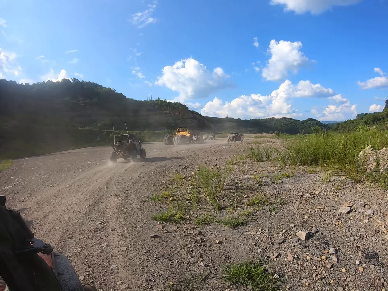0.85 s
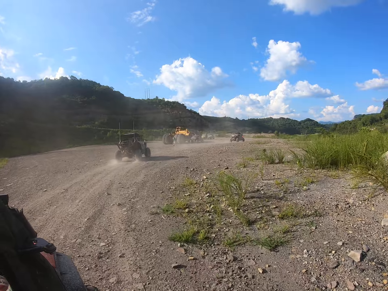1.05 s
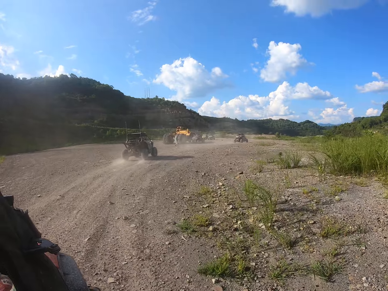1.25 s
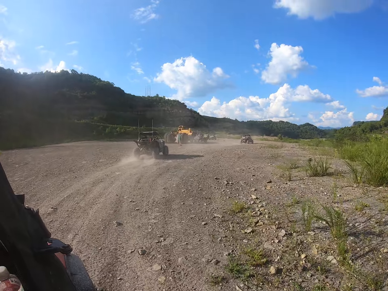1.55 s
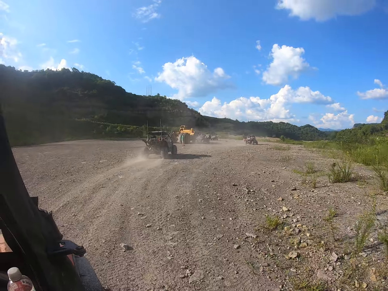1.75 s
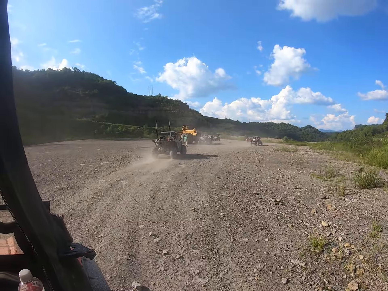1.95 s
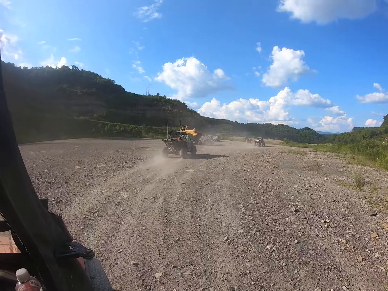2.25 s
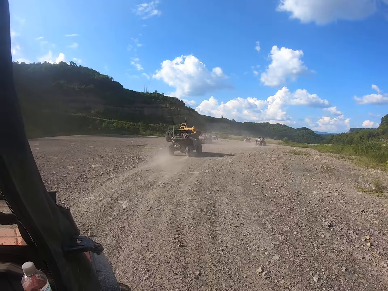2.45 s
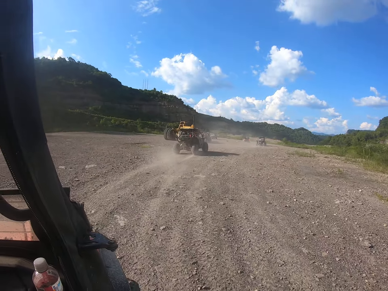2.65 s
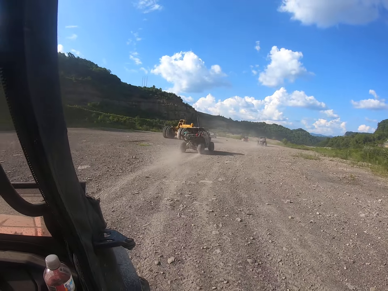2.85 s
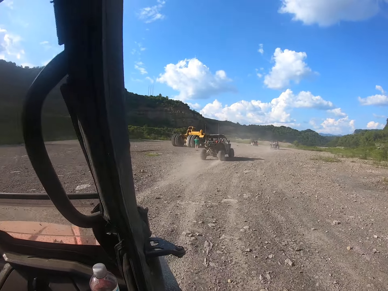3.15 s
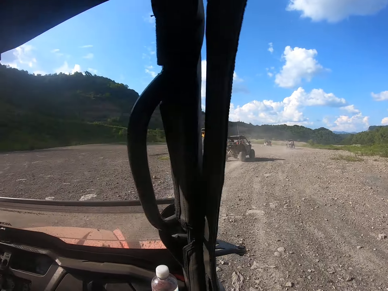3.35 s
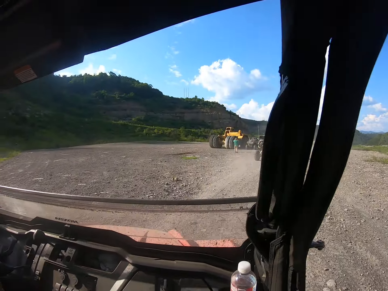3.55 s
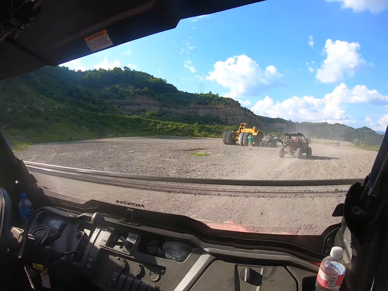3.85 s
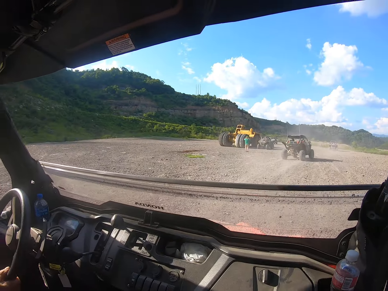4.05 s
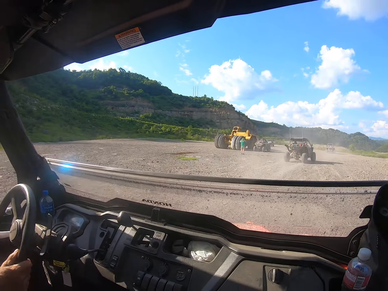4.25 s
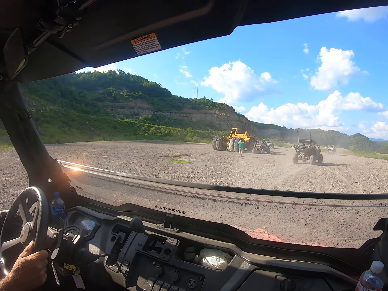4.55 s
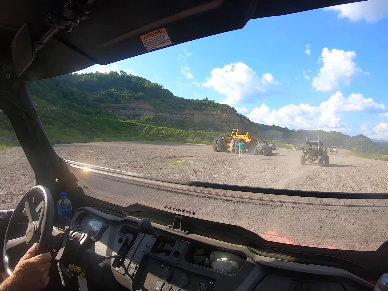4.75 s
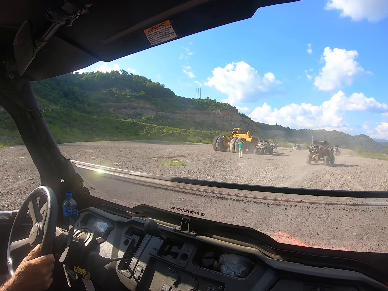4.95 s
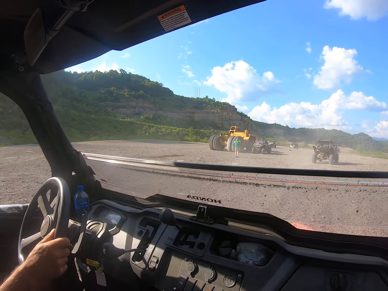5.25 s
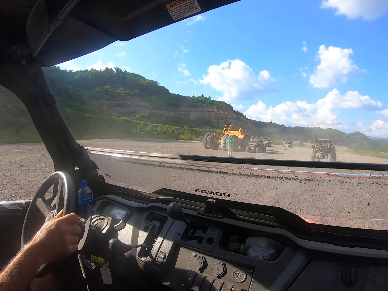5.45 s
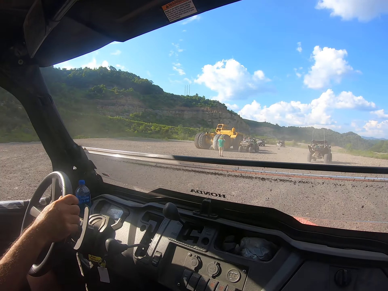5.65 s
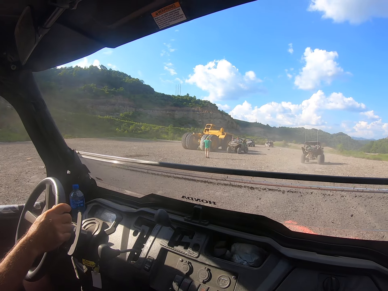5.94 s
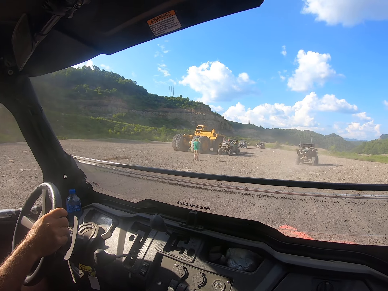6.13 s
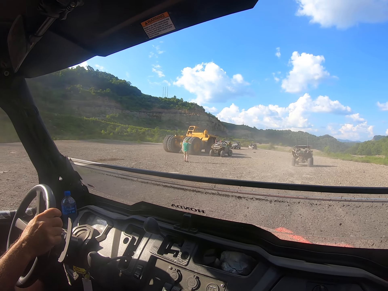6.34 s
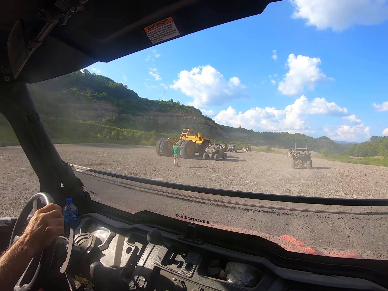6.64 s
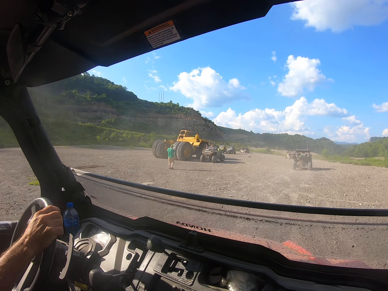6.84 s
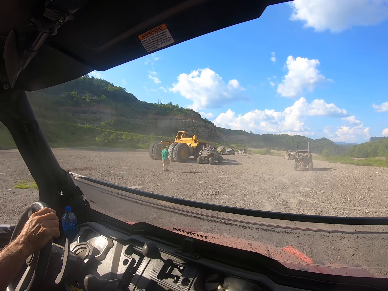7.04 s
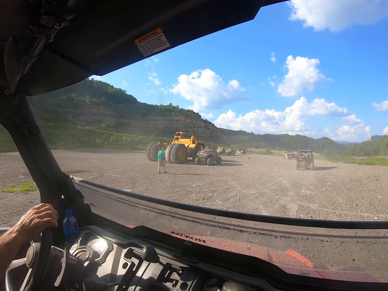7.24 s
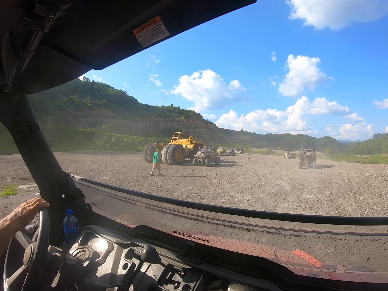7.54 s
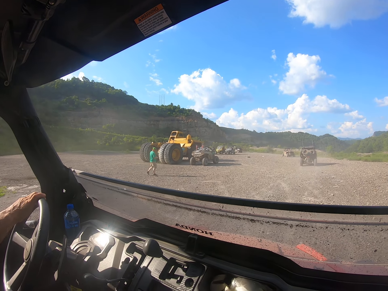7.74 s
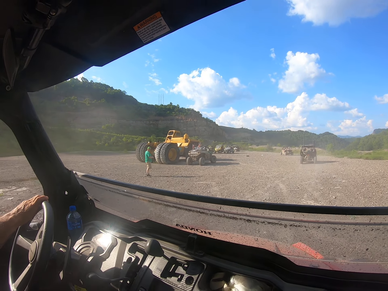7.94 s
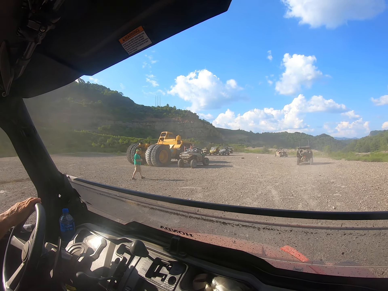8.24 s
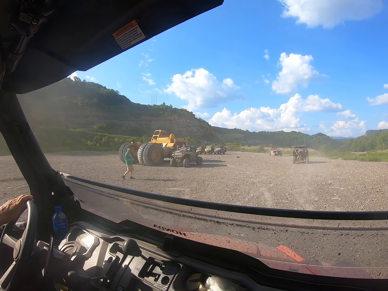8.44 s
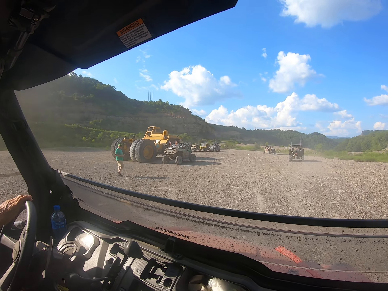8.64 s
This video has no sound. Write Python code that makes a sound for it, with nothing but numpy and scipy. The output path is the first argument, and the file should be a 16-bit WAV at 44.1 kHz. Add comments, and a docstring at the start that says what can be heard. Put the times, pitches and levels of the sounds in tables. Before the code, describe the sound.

From the passenger side of an off-road buggy on a stony track, heavy low wind buffets the microphone while loose plastic knocks rapidly. The twin-cylinder engine drones under tyre hum, gear whine and gravel crunch. The microphone then moves inside: wind drops, a hand scuffs its housing, panels clatter on bumps, and the vehicle gradually slows with a lower engine note.

```python
"""Passenger seat of a side-by-side on a stony trail: it picks up speed for 2.5 s, then slows.
A twin-cylinder engine drones in multiples of its firing rate; tread hum and gear whine follow road speed.
Gravel and wind are coloured noise; a loose plastic fitting, cab panels and stones ring as struck modes.
One microphone starts out in the wind and is drawn into the cab; a hand then scuffs and rubs its housing."""
import sys
import numpy as np
from scipy import signal
from scipy.fft import rfft, irfft, next_fast_len
from scipy.io import wavfile

SR = 44100
rng = np.random.default_rng(int(sys.argv[2]) if len(sys.argv) > 2 else 0)


def digitize_waveform(pressure):
    """Quantize a signal to 16-bit integers and store it at the path in sys.argv[1].

    Rows of a 2-D input are taken as channels; values are limited to [-1, 1].
    """
    field = np.atleast_2d(pressure).T
    bounded = np.clip(field, -1, 1)
    quanta = np.round(bounded * 32767).astype(np.int16)
    wavfile.write(sys.argv[1], SR, quanta)


N = 387625
TIME = np.arange(N) / SR   # s

# wind at the microphone: f/Hz, relative level/dB per Hz
WIND_SPECTRUM = [(12, -21), (26, 6), (48, -3.5), (70, -15.5), (130, -18), (200, -22), (320, -31.5),
                 (800, -77)]
# gusts and lulls: t/s, half length/s, rise/dB
GUSTS_AND_LULLS = [(0.148, 0.24, -2), (.72, 0.14, 1.5), (1.752, 0.11, -2), (2.29, 0.27, 2), (3.25, 0.13, 7)]
WIND_OUTSIDE_DB, WIND_INSIDE_DB, WIND_DB_PER_DOUBLING = -22, -37.5, 16
CRUISE_LUGS_PER_S = 69   # the draught in the cab has its inside level at this speed
CAB_ENTRY_S, CAB_INSIDE_S = 2.87, 3.5   # the microphone is drawn in between these times

# strokes of the hand on the housing: t/s, length/s, body level/dB, hiss level/dB
SCUFF_STROKES = [(3.861, .088, -24, -40), (3.95, .035, -28.5, -44), (4.018, .042, -27, -44),
                 (4.07, .045, -38, -46), (4.479, .034, -25, -48)]
SCUFF_ATTACK_S, SCUFF_RELEASE_S = .002, .009
# dull rubs and bumps on the housing: t/s of the middle, half length/s, f/Hz in the middle, glide/(Hz per s), level/dB
HOUSING_RUBS = [(3.872, .007, 85, 0, -13), (3.942, .008, 70, 0, -10.5), (4.03, .025, 145, -500, -16.5),
                (4.28, .013, 65, 0, -22), (4.445, .006, 150, 0, -18), (4.555, .038, 194, -200, -16.5),
                (4.742, .019, 186, 1000, -15), (4.812, .028, 185, -300, -24), (5.0, .014, 195, -1000, -19),
                (5.108, .027, 200, -300, -15.5), (5.118, .027, 105, -500, -19), (5.91, .03, 175, 0, -26),
                (6.015, .045, 185, 0, -23)]
# scuffed housing: f/Hz, relative level/dB per Hz
HOUSING_SPECTRUM = [(350, -18), (600, -7), (1000, 13), (1600, 10), (2400, 2), (2750, -16), (3500, -12),
                    (3900, -26), (4700, -17), (5500, -34), (6500, -39), (8500, -45), (11000, -58),
                    (13800, -51)]
# hiss of skin: f/Hz, relative level/dB per Hz
SKIN_SPECTRUM = [(2000, 14), (3000, 9), (3900, 0), (4800, 7), (5800, -7), (8000, -11.5), (10500, -19),
                 (14000, -29)]

# stones that ping off metal: t/s, peak level/dB, f/Hz, t60/s
STONE_PINGS = [(2.402, -52, 8900, .008), (4.408, -57, 11200, .003), (4.998, -47, 9600, 0.0035),
               (5.353, -48, 7500, .0006), (7.771, -44, 8100, 0.0014), (8.488, -46, 6000, .0005)]
LOOSE_STONES_S, LOOSE_STONES_HALF_S, LOOSE_STONES_DB = 6.15, .4, 4.5   # the patter swells over loose stones

# blows of the loose fitting: t/s, level/dB of the low, middle and high modes, crack level/dB
FITTING_KNOCKS = [(0.029, -40.5, -36.5, -51, -68), (0.094, -45, -35.5, -30.5, -65),
                  (0.432, -35, -37, -57, -63), (0.569, -39, -42, -50, -68), (0.591, -41, -37.5, -34, -65),
                  (0.683, -30.5, -26, -23.5, -44), (0.744, -27, -22.5, -25, -48),
                  (0.817, -36, -32, -41, -61), (0.829, -26.5, -19, -23.5, -50),
                  (0.85, -37, -28.5, -31, -65), (0.914, -27.5, -18.5, -25, -46),
                  (0.976, -28, -33.5, -43, -62.5), (1.006, -24.5, -21, -37, -57.0),
                  (1.022, -31, -26, -28, -53), (1.042, -38, -35, -21.5, -49),
                  (1.111, -21.5, -18.5, -24, -43), (1.157, -25, -24.5, -47, -67),
                  (1.192, -32, -33, -46, -69), (1.24, -33, -29, -37, -68.0),
                  (1.279, -23, -20.5, -31.5, -48), (1.289, -27.5, -24.5, -44, -55.5),
                  (1.415, -25.5, -24.5, -37, -57.5), (1.452, -26, -36, -28, -51),
                  (1.46, -22.5, -18.5, -29, -41), (1.475, -35, -27, -33, -66.5),
                  (1.502, -29.5, -35, -54, -63.5), (1.514, -37, -36.5, -52, -63),
                  (1.56, -30, -28, -35, -67), (1.677, -21.5, -21, -28.5, -48),
                  (1.685, -29, -25.5, -47, -57), (1.787, -30.5, -40, -47, -62),
                  (3.435, -47, -35.5, -47, -56), (3.468, -33, -35.5, -44, -64.5),
                  (3.511, -25, -19.5, -28.5, -58.0), (3.525, -27.5, -27, -36, -64.5),
                  (3.634, -33, -31.5, -40, -67), (3.673, -35, -37, -44, -64),
                  (3.733, -35.5, -31.5, -39, -64.5), (3.99, -28.5, -31, -26.5, -46),
                  (4.02, -27.5, -35, -33, -44), (4.109, -40.5, -48, -54, -64), (4.149, -53, -44, -50, -66),
                  (4.209, -38, -39, -45, -60.0), (4.263, -38, -48, -49, -66), (4.504, -40, -34, -46, -57),
                  (4.659, -52.5, -39.5, -38.5, -64), (4.8, -42, -31, -40, -64), (4.859, -49, -50, -49, -66),
                  (4.907, -43, -41, -46, -63), (6.665, -39, -43, -31.5, -40)]
KNOCK_S = .02   # levels of knocks and cracks are those of their energy spread over this time
# modes of the fitting in a low, a middle and a high group: nominal f/Hz, relative level/dB, t60/s
FITTING_MODES = [
    [(662, -5.5, 0.044), (735, 6, 0.0085)],
    [(1011, 0.5, 0.018), (1118, 2.5, 0.02), (1252, -2.5, 0.011)],
    [(1380, 5.5, 0.0057), (1664, 0, 0.019), (2260, -9, 0.011)],
]
FITTING_BAND_HZ = (520, 2270)   # too small to radiate below this band, too soft to ring above it
# clatter of the cab panels: t/s, peak level of the ringing/dB, decay time of the skid/s, crack level/dB
PANEL_CLATTER = [(3.162, -24, 0.0031, -57), (3.334, -21.5, 0.0032, -61), (4.442, -20, 0.0027, -60),
                 (4.721, -33, .003, -60), (4.777, -29, .006, -50), (4.80, -34, 0.0037, -59),
                 (4.9503, -26, 0.013, -57), (5.198, -26.5, 0.012, -45), (5.356, -33, .005, -47),
                 (5.764, -22.5, 0.026, -58), (5.8024, -22.5, 0.015, -50), (5.866, -20, 0.0046, -59),
                 (5.902, -18, 0.011, -54), (5.9684, -27, 0.0045, -55), (6.1984, -23.5, .006, -61),
                 (6.278, -25, .008, -60), (6.476, -22, 0.011, -59), (7.774, -38, 0.0056, -44),
                 (8.49, -29.5, 0.013, -47)]
# modes of the panels: nominal f/Hz, relative level/dB, nominal t60/s
PANEL_MODES = [(716, -7, 0.0072), (1043, 0, 0.03), (1193, -8.5, 0.063), (1454, -1.5, 0.019),
               (1908, 2.5, 0.021), (2250, 2, 0.015), (2970, -12.5, 0.014), (3290, -10.5, 0.013),
               (4660, -10.5, 0.011), (5600, -26, 0.0087)]
# snap of a hard contact: f/Hz, relative level/dB per Hz
CRACK_SPECTRUM = [(1500, -5), (2600, 3), (3000, 9), (3450, 5), (4000, -11), (4700, -7), (5600, -15.5),
                  (7000, -32.5), (11000, -35)]

# the ground under way: t/s, reference level of the gears/dB, reference level of the gravel/dB
GROUND_LEVEL = [(0, -40.5, -53.5), (.55, -38, -50), (1.0, -40.5, -54.5), (2.3, -38.5, -48.5),
                (3.4, -35, -49), (4.3, -39, -51), (5.4, -37, -50.5), (6.2, -34.5, -48), (7.9, -37.5, -48),
                (8.79, -42.5, -50.5)]
# gravel grit: f/Hz, relative level/dB per Hz
GRAVEL_SPECTRUM = [(1800, -11.5), (2400, 3.5), (2750, 0.5), (3300, 2.5), (3900, -7), (4550, -4.5),
                   (5200, -13.5), (5800, -12.5), (6500, -17.5), (8300, -17), (9100, -24), (9900, -32.5),
                   (11000, -29), (13800, -39)]
# tyre roar: f/Hz, relative level/dB per Hz
ROAR_SPECTRUM = [(300, -6), (500, 0.5), (650, -4), (800, -4), (1050, 1), (1280, -6), (1700, -6.5),
                 (3000, -44.5)]
# floor pan heard in the cab: f/Hz, relative level/dB per Hz
FLOOR_SPECTRUM = [(250, -7.5), (340, 0.5), (460, 2.5), (560, -2.5), (720, -8), (900, -19)]
# chassis boom: f/Hz, relative level/dB per Hz
CHASSIS_SPECTRUM = [(30, -17), (60, 15), (110, 12), (180, 8.5), (250, 0), (330, 0), (450, -8.5),
                    (600, -25.5), (1200, -46.5)]
CHASSIS_OUTSIDE_DB, CHASSIS_INSIDE_DB = -33, -31
ROUGH_PATCH_S, ROUGH_PATCH_HALF_S, ROUGH_PATCH_DB = 3.83, 0.11, 4   # the chassis booms over a rough patch

# road speed: t/s, tread lugs per s
LUG_RATE = [(0, 52), (1, 72), (1.8, 74.5), (2.5, 80.5), (3.0, 73), (3.4, 72.7), (4.2, 69), (4.8, 63.5),
            (5.8, 59.5), (6.3, 55.7), (6.8, 54), (7.15, 51.2), (7.8, 50.5), (8.6, 47)]
# tread hum: multiple of the lug rate, relative level/dB
TREAD_ORDERS = [(1, 10), (2, -6.5)]
# strength of the tread hum: t/s, level/dB
TREAD_LEVELS = [(0, -28), (1.4, -45), (2.2, -32), (3.4, -25.5), (4.0, -42), (4.9, -31.5), (7.1, -35),
                (7.8, -32.5), (8.79, -48)]

# gear mesh: multiple of the lug rate, width/Hz, relative level/dB, loudest near f/Hz, reach/Hz
GEAR_MESH = [(28.2, 26, -16, 2100, 260), (30.37, 12, -10, 1600, 360), (30.54, 38, -10, 2230, 150),
             (31.6, 12, -11, 1490, 160), (32.63, 34, -12.5, 1470, 690), (33.4, 34, -17, 2350, 170),
             (68.7, 32, -15, 3330, 45)]
# three modes of the gearbox casing: f/Hz, width/Hz
CASING_MODES = [(1680, 27), (1800, 26), (2295, 42)]
# strength of those three modes: t/s, then relative level/dB of each
CASING_LEVELS = [(0, -15.5, -17, -13), (2.2, -7.5, -11, -13), (3.3, -12, -11, -23), (4.4, -12, -6.5, -27),
                 (5.4, -14, -11, -16), (6.7, -6.5, -6.5, -24.5), (7.6, -12, -10, -15.5),
                 (8.79, -5.5, -22, -18)]
# gear whirr: f/Hz, relative level/dB per Hz
GEAR_SPECTRUM = [(1000, -48), (1310, -11), (1460, 7.5), (1750, 5), (2000, 5), (2400, 0), (2600, -31.5),
                 (3500, -47.5)]

# belt whistle: t/s, mean level/dB
BELT_LEVEL = [(3.3, -82), (3.7, -68), (4.3, -74), (4.95, -67.5), (5.25, -73), (5.55, -68), (6.7, -63.5),
              (6.95, -57.5), (7.3, -61.5), (7.6, -58), (8.2, -58.5), (8.5, -70)]
WHISTLE_PER_FIRING = 103.3   # the belt whistles at this multiple of the firing rate

# engine speed: t/s, firings per s
FIRING_RATE = [(0, 55), (2.2, 52.6), (4.6, 53.6), (5.0, 52.7), (5.55, 53), (6.05, 50.8), (6.25, 48.9),
               (6.7, 48.2), (6.95, 47.1), (7.25, 44), (7.6, 46.6), (8.05, 44.8), (8.3, 43.2), (8.79, 41.8)]
# exhaust: multiple of the firing rate, relative level/dB
EXHAUST_ORDERS = [(1, -9), (1.5, -26), (2, 3.5), (2.5, -4), (3, -9), (3.5, -16.5), (4, -13), (4.5, -14),
                  (5, -21), (5.5, -21.5), (6, -24.5), (6.5, -27), (7, -16), (8, -27)]
# strength of the exhaust: t/s, level/dB
EXHAUST_LEVELS = [(0, -35.5), (2.5, -30), (4.7, -29), (5.3, -32), (6.35, -23), (7.15, -28.5), (7.8, -26),
                  (8.79, -31)]
INTAKE_S, INTAKE_HALF_S, INTAKE_DB = 2.15, 0.55, -45   # the intake sings under throttle

CUTOFF_HZ = 14000


def from_db(db):
    """Decibels to gain."""
    return 10 ** (np.asarray(db) / 20)


def rms_one(x):
    """Scale to unit power."""
    return x / np.sqrt(np.mean(x ** 2) + 1e-20)


def in_time(rows):
    """Each column of a curve at every sample."""
    s, *columns = np.transpose(rows)
    return [np.interp(TIME, s, c) for c in columns]


def swell(s, half_s):
    """A smooth rise and fall of height 1 round a given time."""
    return np.exp(-((TIME - s) / half_s) ** 2 / 2)


def drift(rate):
    """Slow chance of spread 1: low-passed noise, drawn every 40 samples and joined by lines."""
    step = 40
    r = np.exp(-2 * np.pi * rate * step / SR)
    steps = rng.standard_normal(N // step + 2002)
    slow = signal.lfilter([1], [1, -2 * r, r * r], steps)[2000:]   # the filter has settled by then
    return np.interp(np.arange(N) / step, np.arange(len(slow)), rms_one(slow))


def colour(x, spectrum):
    """Give an excitation a spectrum; rms 1."""
    size = next_fast_len(len(x))
    hz, db = np.transpose(spectrum)
    log_bins = np.log(np.fft.rfftfreq(size, 1 / SR) + 1e-3)
    gain = from_db(np.interp(log_bins, np.log(hz), db, left=-120, right=-120))
    return rms_one(irfft(rfft(x, size) * gain, size)[:len(x)])


def noise(spectrum, flutter_db, rate):
    """Coloured noise whose strength flutters."""
    return colour(rng.standard_normal(N) * from_db(flutter_db * drift(rate)), spectrum)


def turning(per_s):
    """Angle of something that turns at a changing rate."""
    return 2 * np.pi * np.cumsum(per_s * np.ones(N)) / SR


def narrow(hz, width_hz):
    """A rough tone: noise gathered round a moving centre; rms 1."""
    angle = turning(hz)
    return rms_one(drift(width_hz) * np.cos(angle) + drift(width_hz) * np.sin(angle))


def orders(per_s, table, rough, rough_rate):
    """Multiples of a rotation, each unsteady in strength and timing; rms 1."""
    angle = turning(per_s)
    total = np.zeros(N)
    for multiple, db in table:
        strength = from_db(db) * (1 + rough * drift(rough_rate))
        phase = rng.uniform(0, 2 * np.pi) + rough * drift(rough_rate)
        total += strength * np.sin(multiple * angle + phase)
    return rms_one(total)


def ring(clicks, hz, t60):
    """A unit click sets a decaying sine of height 1 ringing."""
    r, w = from_db(-60 / (t60 * SR)), 2 * np.pi * hz / SR
    return signal.lfilter([0, np.sin(w)], [1, -2 * r * np.cos(w), r * r], clicks + 1e-18)


def add(out, s, sound):
    """Mix a sound in from a given time."""
    start = round(s * SR)
    part = sound[max(-start, 0):N - start]
    out[max(start, 0):max(start, 0) + len(part)] += part


def at_level(sound, db):
    """Scale a short sound so that its energy, spread over KNOCK_S, has the given level."""
    return from_db(db) * sound * np.sqrt(KNOCK_S * SR / np.sum(sound ** 2))


def wind(lug_rate, in_cab):
    """Air buffets the microphone in gusts outside; in the cab a draught remains that drops with speed."""
    doublings = np.log2(lug_rate / CRUISE_LUGS_PER_S)
    outside_db = WIND_OUTSIDE_DB + sum(db * swell(s, half_s) for s, half_s, db in GUSTS_AND_LULLS)
    inside_db = WIND_INSIDE_DB + WIND_DB_PER_DOUBLING * doublings
    level_db = outside_db + (inside_db - outside_db) * in_cab
    return from_db(level_db) * noise(WIND_SPECTRUM, flutter_db=1.5, rate=7.5)


def scuffs():
    """Skin catches and slips along the housing: grainy strokes of housing noise and skin hiss."""
    body, hiss = np.zeros(N), np.zeros(N)
    for s, length, body_db, hiss_db in SCUFF_STROKES:
        attack = np.clip((TIME - s) / SCUFF_ATTACK_S + 1, 0, 1)
        release = np.exp(-np.maximum(TIME - s - length, 0) / SCUFF_RELEASE_S)
        body = np.maximum(body, from_db(body_db) * attack * release)
        hiss = np.maximum(hiss, from_db(hiss_db) * attack * release)
    catching = rms_one(from_db(2.8 * drift(220)))
    housing_noise = noise(HOUSING_SPECTRUM, flutter_db=1.5, rate=39)
    skin_noise = noise(SKIN_SPECTRUM, flutter_db=0.0, rate=220)
    return catching * (body * housing_noise + hiss * skin_noise)


def rubs():
    """Skin judders on the housing in dull low tones of gliding, unsteady pitch."""
    out = np.zeros(N)
    unsteady, grip = 1 + 0.08 * drift(44), from_db(2 * drift(60))
    for s, half_s, hz, glide, db in HOUSING_RUBS:
        angle = turning((hz + glide * (TIME - s)) * unsteady)
        judder = rms_one(grip * np.cos(angle - angle[round(s * SR)]))
        out += from_db(db) * judder * swell(s, half_s)   # the push is hardest in the middle
    return out


def flung_stones():
    """Stones skitter off metal: a dying burst of grains rings one high mode."""
    out, t = np.zeros(N), np.arange(SR // 10) / SR
    for s, db, hz, t60 in STONE_PINGS:
        skitter = rng.standard_normal(len(t)) * np.exp(-t / 0.0074)
        ping = ring(np.diff(skitter, prepend=0), hz, t60)
        add(out, s, from_db(db) * ping / np.abs(ping).max())
    return out


def pebbles():
    """Small pebbles patter on the floor pan: chance hits, 110 per s on average, ring the panel modes."""
    landed = (rng.random(N) < 110 / SR) * rng.uniform(0.6, 1, N)
    hits = landed * rng.standard_normal(N)
    # here the modes ring 1.3 times as long as nominal
    patter = sum(from_db(db) * ring(hits, hz, t60 * 1.3) for hz, db, t60 in PANEL_MODES)
    level_db = -51.5 + LOOSE_STONES_DB * swell(LOOSE_STONES_S, LOOSE_STONES_HALF_S)
    return from_db(level_db) * rms_one(patter)


def contact(rise_s, fall_s, graze):
    """A blow amid a swell of grazing touches: a fifth of a second with the blow in the middle."""
    t = np.arange(-SR // 10, SR // 10) / SR
    pressure = np.exp(np.where(t < 0, t / rise_s, -t / fall_s))
    touching = rng.random(len(t)) < 2500 / SR
    touches = graze * pressure * rng.standard_normal(len(t)) * touching
    touches[len(t) // 2] += 1
    return touches


def chatter(touches, modes, detune, soft_hz):
    """Touches ring a body's modes, a little differently each time; peak 1."""
    body, sign = np.zeros(len(touches)), 1
    for hz, db, t60 in modes:
        level_chance, pitch_chance = rng.standard_normal(2)
        mode = ring(touches, hz * (1 + detune * pitch_chance), t60)
        body += sign * from_db(db + 2 * level_chance) * mode
        sign = -sign   # neighbouring modes have opposite sign
    # the contact gives way: no sharp edge
    body = signal.sosfilt(signal.butter(2, soft_hz, fs=SR, output="sos"), body)
    return body / np.abs(body).max()


def crack(db):
    """The brief snap of a hard contact."""
    return at_level(colour(contact(rise_s=0.0016, fall_s=0.0036, graze=0.7), CRACK_SPECTRUM), db)


def knock(groups_db):
    """The fitting brushes its mount, lands in one firm blow and rings its three groups of modes."""
    touches = contact(rise_s=0.008, fall_s=0.006, graze=0.2)
    band = signal.butter(3, FITTING_BAND_HZ, "band", fs=SR, output="sos")
    sound = np.zeros(len(touches))
    for db, modes in zip(groups_db, FITTING_MODES):   # the balance depends on where it hits
        group = chatter(touches, modes, detune=0.055, soft_hz=4000)
        sound += at_level(signal.sosfiltfilt(band, group), db)
    return sound


def panels():
    """Bumps make the cab panels clatter: a blow, a skid of touches and a crack."""
    out = np.zeros(N)
    for s, db, skid_s, crack_db in PANEL_CLATTER:
        touches = contact(rise_s=0.0044, fall_s=skid_s, graze=0.85)
        clatter = from_db(db) * chatter(touches, PANEL_MODES, detune=0.036, soft_hz=6500)
        add(out, s - 1 / 10, clatter + crack(crack_db))   # the blow is 1/10 s into the sound
    return out


def fitting():
    """Bumps shake the loose fitting: it knocks, cracks and thuds on its mount in two low modes."""
    out, jolts = np.zeros(N), np.zeros(N)
    for s, *groups_db, crack_db in FITTING_KNOCKS:
        # the blow is 1/10 s into the sound and leads the thud by 1 ms
        add(out, s - .001 - 1 / 10, knock(groups_db) + crack(crack_db))
        jolts[round(s * SR)] = from_db(max(groups_db))
    thud = ring(jolts, hz=158.5, t60=0.072) - ring(jolts, hz=212.6, t60=0.048)
    return out + from_db(2.5) * thud


def gravel(gravel_db, in_cab):
    """Grit crunches, tyres roar, the floor pan passes it into the cab and metal parts ring thinly."""
    grit = from_db(gravel_db) * noise(GRAVEL_SPECTRUM, flutter_db=1.07, rate=59)
    roar = from_db(gravel_db + 4.5) * noise(ROAR_SPECTRUM, flutter_db=1.5, rate=36)
    floor_pan = in_cab * from_db(gravel_db + 1.5) * noise(FLOOR_SPECTRUM, flutter_db=1.0, rate=30)
    metal = from_db(gravel_db - 16.5 - 1.7 * in_cab) * narrow(hz=4520, width_hz=30)
    return grit + roar + floor_pan + metal


def chassis(in_cab):
    """The chassis booms as low noise, a little stronger in the cab and over a rough patch."""
    level_db = CHASSIS_OUTSIDE_DB + (CHASSIS_INSIDE_DB - CHASSIS_OUTSIDE_DB) * in_cab
    level_db = level_db + ROUGH_PATCH_DB * swell(ROUGH_PATCH_S, ROUGH_PATCH_HALF_S)
    return from_db(level_db) * noise(CHASSIS_SPECTRUM, flutter_db=0.0, rate=46)


def tread(lug_rate):
    """Tread lugs hum at the rate they meet the ground and at twice that rate."""
    tread_db, = in_time(TREAD_LEVELS)
    return from_db(tread_db) * orders(lug_rate, TREAD_ORDERS, rough=0.46, rough_rate=6.2)


def gears(lug_rate, gear_db, in_cab):
    """Gears whine with road speed and ring their casing, more clearly inside the cab."""
    tones = np.zeros(N)
    for multiple, width, db, centre, reach in GEAR_MESH:
        hz = multiple * lug_rate
        # each tone swells as it glides through a resonance
        resonance = 1 / np.hypot(1, ((hz - centre) / reach) ** 2)
        tones += from_db(db) * narrow(hz, width) * resonance
    for (hz, width), db in zip(CASING_MODES, in_time(CASING_LEVELS)):
        tones += from_db(db) * narrow(hz, width)
    tones_db = -1.0 + 1.77 * in_cab
    whirr = from_db(-4.5) * noise(GEAR_SPECTRUM, flutter_db=1.0, rate=67)
    return from_db(gear_db) * (from_db(tones_db) * tones + whirr)


def belt(firing):
    """The drive belt whistles with fluttering strength; its pitch follows the engine."""
    whistle_db, = in_time(BELT_LEVEL)
    return from_db(whistle_db + 2 * drift(6)) * narrow(WHISTLE_PER_FIRING * firing, width_hz=90)


def engine(firing):
    """Exhaust pulses drone in half-orders of firing, the intake sings, the air under the roof resonates."""
    exhaust_db, = in_time(EXHAUST_LEVELS)
    exhaust = from_db(exhaust_db) * orders(firing, EXHAUST_ORDERS, rough=0.57, rough_rate=3.6)
    intake = from_db(INTAKE_DB) * swell(INTAKE_S, INTAKE_HALF_S) * narrow(7 * firing, width_hz=4)
    cab_boom = from_db(exhaust_db - 12.5) * narrow(hz=108.75, width_hz=4.0)
    return exhaust + intake + cab_boom


def scene():
    """Wind, hand, stones, rattles, running gear and engine at one microphone."""
    firing, = in_time(FIRING_RATE)
    lug_rate, = in_time(LUG_RATE)
    gear_db, gravel_db = in_time(GROUND_LEVEL)
    in_cab = np.interp(TIME, [CAB_ENTRY_S, CAB_INSIDE_S], [0, 1])   # 0 outside, 1 inside
    at_microphone = wind(lug_rate, in_cab) + scuffs() + rubs()
    rattles = flung_stones() + pebbles() + panels() + fitting()
    on_the_ground = gravel(gravel_db, in_cab) + chassis(in_cab) + tread(lug_rate)
    machinery = gears(lug_rate, gear_db, in_cab) + belt(firing) + engine(firing)
    return (at_microphone + rattles + on_the_ground + machinery)[None]


def record(dry):
    """The top is cut steeply: 70 dB down from CUTOFF_HZ."""
    return signal.sosfilt(signal.cheby2(12, 70, CUTOFF_HZ, fs=SR, output="sos"), dry)


dry = scene()
out = record(dry)
digitize_waveform(out)
```